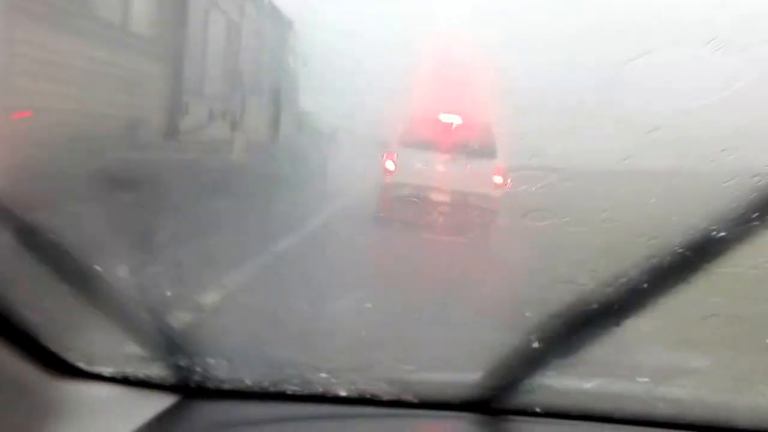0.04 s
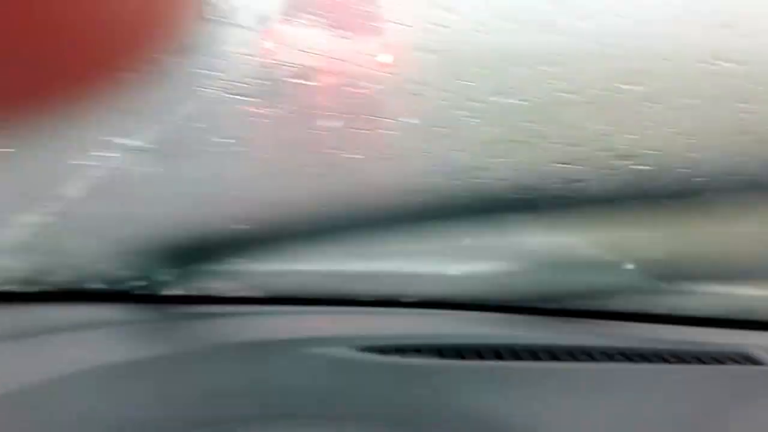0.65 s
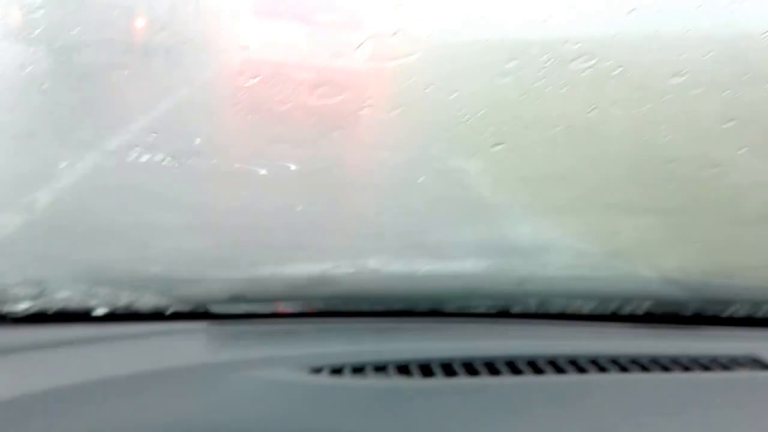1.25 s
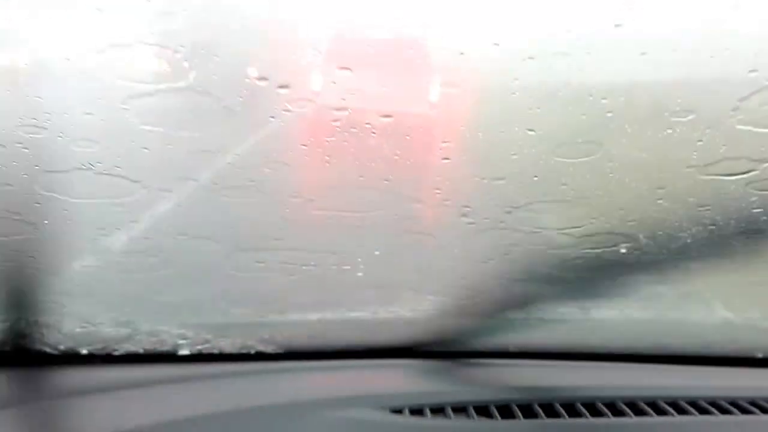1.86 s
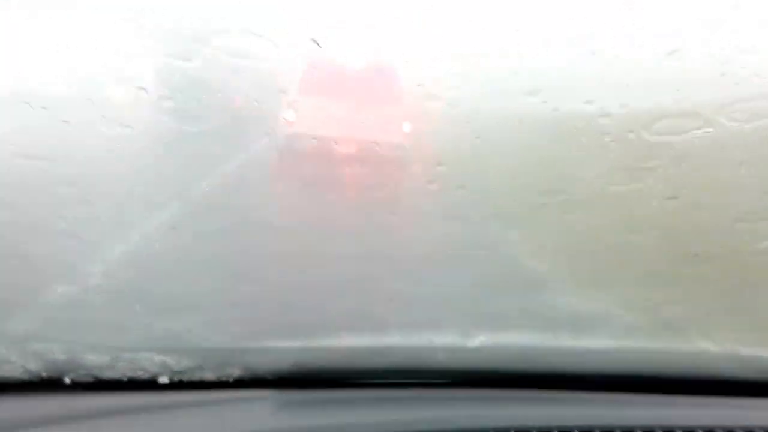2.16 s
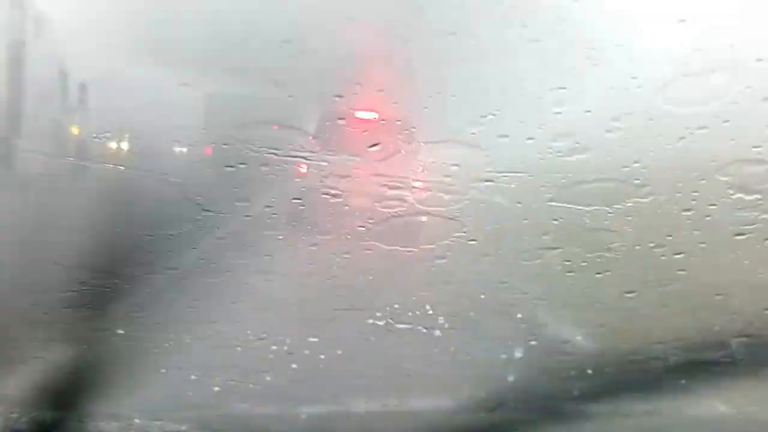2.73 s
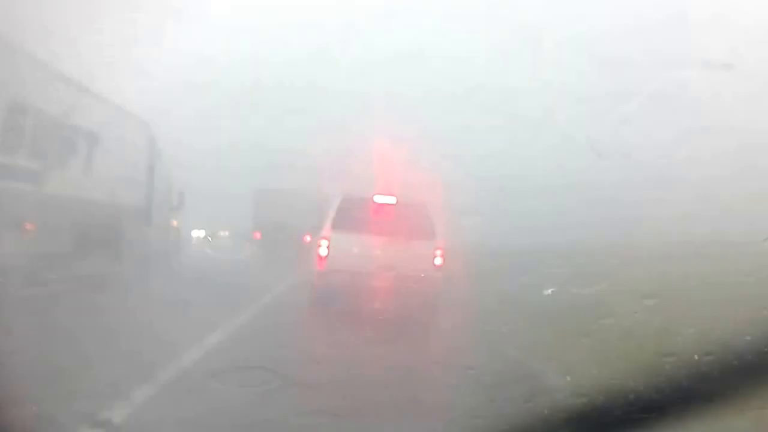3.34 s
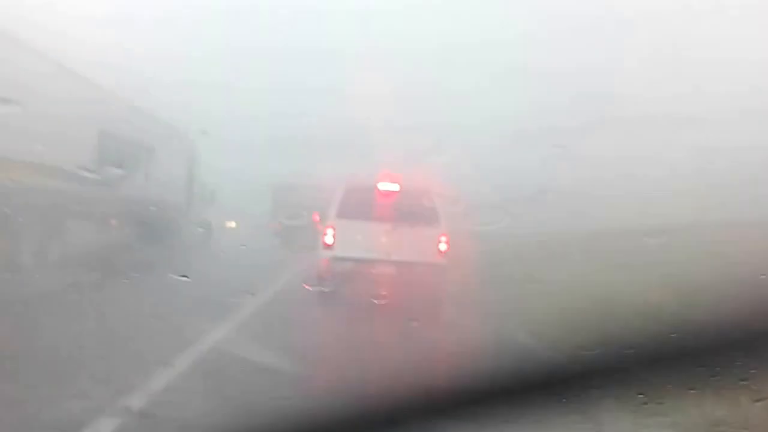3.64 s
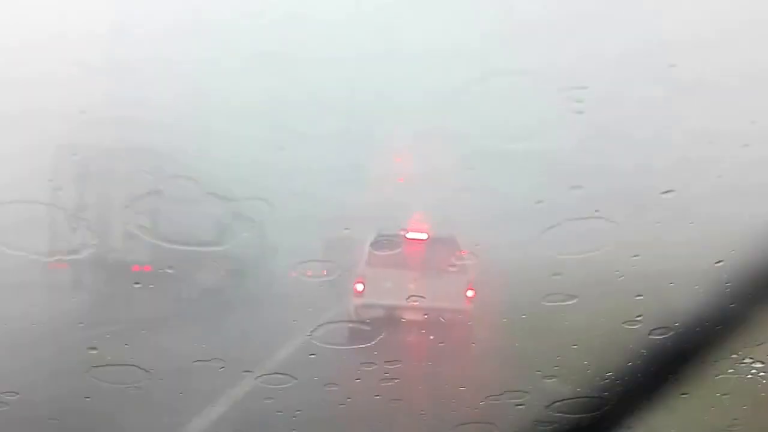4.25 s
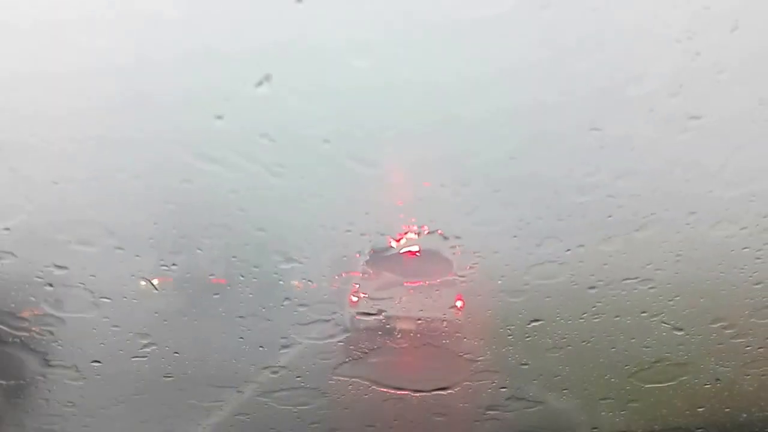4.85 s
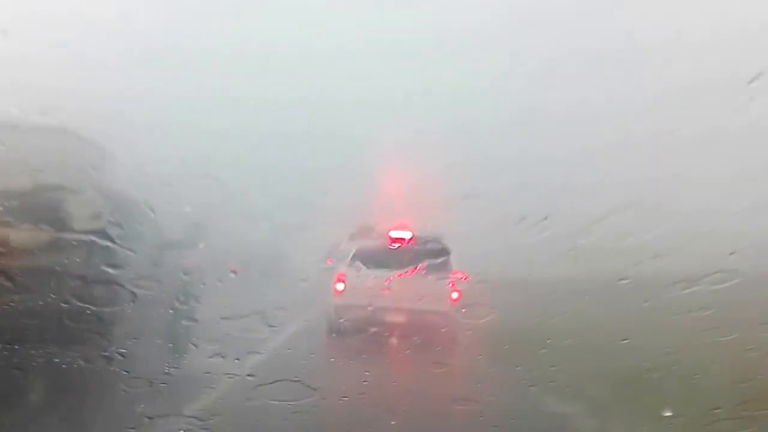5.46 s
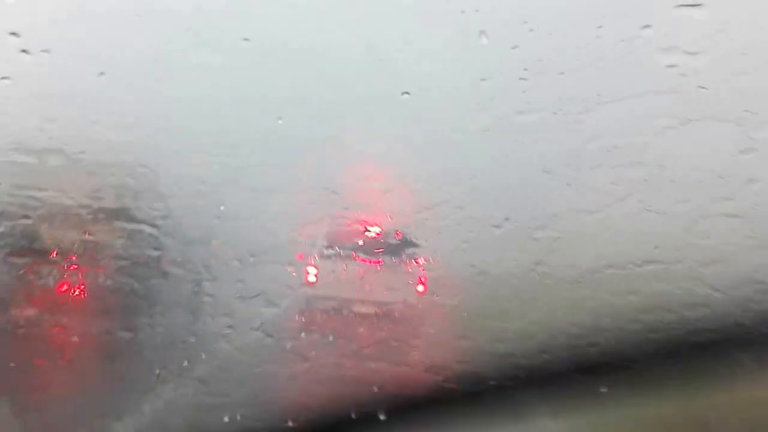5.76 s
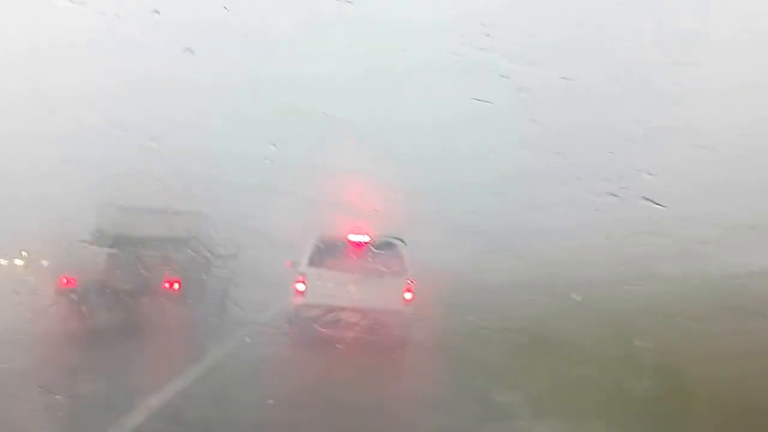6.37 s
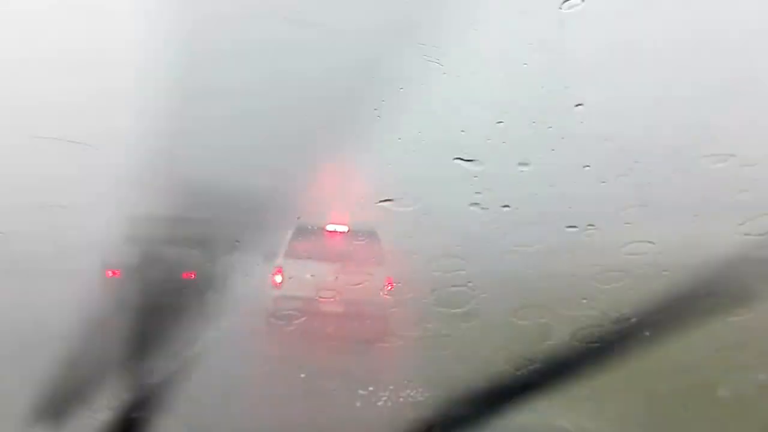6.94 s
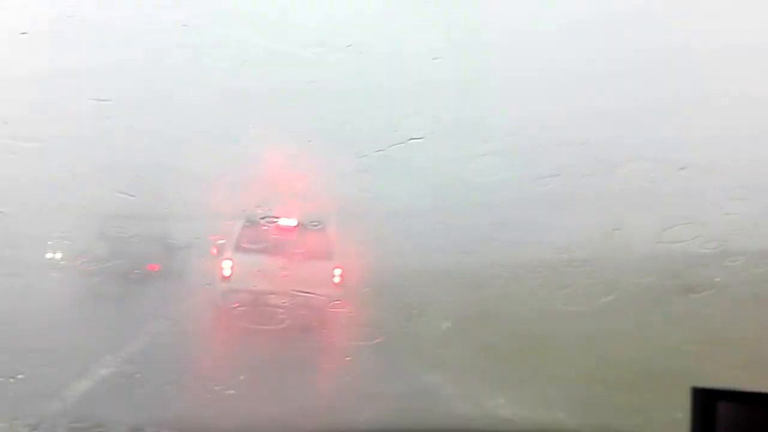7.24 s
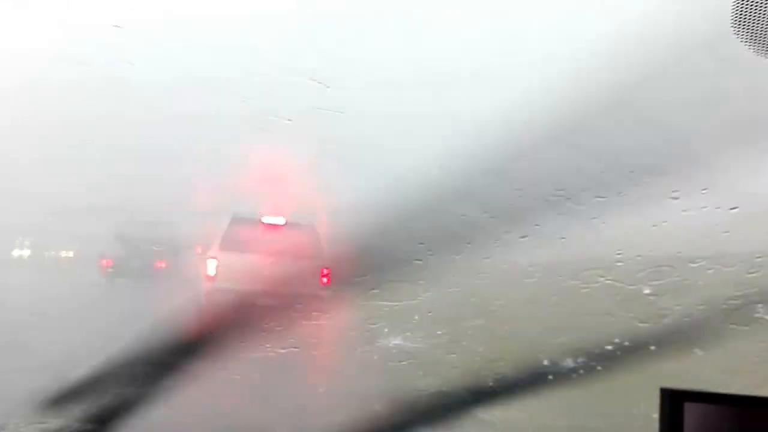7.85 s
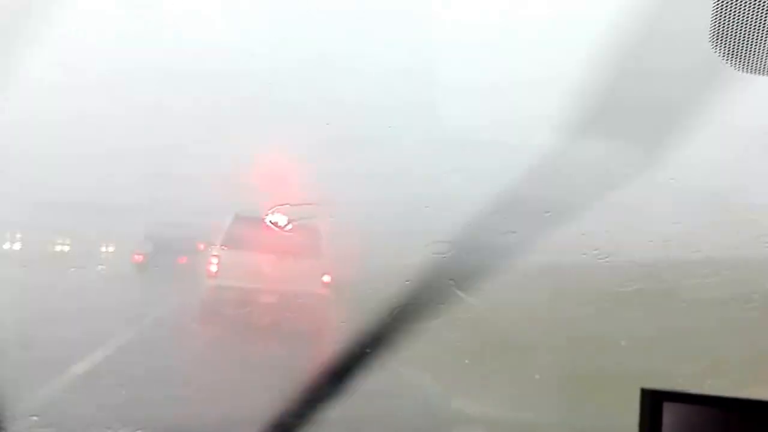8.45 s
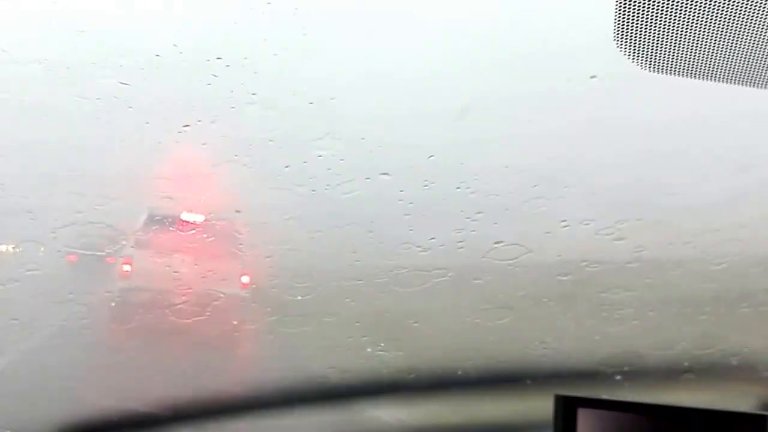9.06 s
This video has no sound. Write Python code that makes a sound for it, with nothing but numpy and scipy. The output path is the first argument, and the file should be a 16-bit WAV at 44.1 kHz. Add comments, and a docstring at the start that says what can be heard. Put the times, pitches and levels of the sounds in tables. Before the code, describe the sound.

Dense hail and rain patter on a car's windshield and roof, with big stones cracking over low tyre drone and engine hum.

```python
"""Inside a car driving slowly through a hailstorm, heard from just behind the windshield.
From the start, tyres drone and the engine hums under a dense patter of small ice and rain. At once big
stones crack on the glass or knock on the roof, ringing the cabin briefly, and bumps and wipers thud
through the body. The hardest hits land around 1 s and 3 s. The engine swells near 4 s, then fades
away, while the hail carries on a little lighter to the end."""
import sys
import numpy as np
from scipy import signal
from scipy.fft import rfft, irfft
from scipy.io import wavfile
from scipy.ndimage import uniform_filter1d

SR = 44100
rng = np.random.default_rng(int(sys.argv[2]) if len(sys.argv) > 2 else 0)


def unload_wav(signal):
    """Save mono or channel-first audio to the path in sys.argv[1] as 16-bit WAV at rate SR, clipped to [-1, 1]."""
    wavfile.write(
        sys.argv[1],
        SR,
        np.round(np.clip(np.atleast_2d(signal).T, -1, 1) * 32767).astype(np.int16),
    )


N = 405719
RING = 4096  # samples for one stone to ring out


def undb(db):
    """Decibels to gain."""
    return 10 ** (np.asarray(db) / 20)


def unit(x):
    """Scale to an rms of 1."""
    return x / np.sqrt(np.mean(x ** 2))


def curves(table):
    """Automation lanes: each column of a table joined by straight lines in time."""
    times, *columns = np.transpose(table)
    return [np.interp(np.arange(N) / SR, times, column) for column in columns]


def swell(start_s, length_s, rise_s, fall_s):
    """Attack, hold and release, from 0 to 1 and back."""
    end_s = start_s + length_s
    return np.interp(np.arange(N) / SR, [start_s - rise_s, start_s, end_s, end_s + fall_s], [0, 1, 1, 0])


def colour(points, hz):
    """Gain of an EQ curve of (frequency [Hz], level [dB]) points at the given frequencies."""
    point_hz, db = np.transpose(points)
    return undb(np.interp(np.log(hz + 1), np.log(point_hz), db))


def noise(points):
    """Noise through an EQ curve, rolling off above its last point."""
    hz = np.fft.rfftfreq(N, 1 / SR)
    gain = colour(points, hz) / np.maximum(1, hz / points[-1][0]) ** 2
    return unit(irfft(rfft(rng.standard_normal(N)) * gain, N))


# fader ride of the tyre drone: (time [s], relative level [dB])
TYRE_LEVELS = [(0, -32), (2.8, -36.5), (3.7, -36.5), (8, -37.5), (9.2, -35.5)]
# cabin response to the tyres: (frequency [Hz], level [dB])
DRONE_EQ = [(30, -18), (95, -7), (128, 3), (185, 0.5), (290, -10.5), (390, -10.5), (520, -17),
            (1000, -22.5), (3000, -25)]
# low boom of the body on its springs: (frequency [Hz], level [dB])
BOOM_EQ = [(15, -24), (34, -2), (43, -3), (51, 7), (66, -6.5), (110, -51)]
# bumps in the road: (start [s], length [s], relative boom level [dB])
BUMPS = [(0.173, 0.046, -28), (0.287, 0.066, -33), (0.584, 0.11, -36), (1.024, 0.168, -31),
         (1.867, 0.074, -31), (2.294, 0.077, -38), (2.705, 0.04, -30), (2.785, 0.03, -30),
         (4.413, 0.056, -37), (5.28, 0.03, -38), (6.089, 0.098, -39), (6.939, 0.034, -35),
         (7.795, 0.061, -35), (8.64, 0.082, -32)]
def road(drone_gain_db=1.5, bump_gain_db=-3, smooth_road_db=-41.5, shake=0.11):
    """Tyres drone through the cabin; each bump booms the body and swells the drone."""
    drone_db, = curves(TYRE_LEVELS)
    jolts = sum(undb(db + bump_gain_db) * swell(start_s, length_s, rise_s=0.026, fall_s=0.079) ** 2
                for start_s, length_s, db in BUMPS)
    boom_gain = undb(smooth_road_db) + jolts
    drone = noise(DRONE_EQ) * undb(drone_db + drone_gain_db) * (boom_gain / boom_gain.mean()) ** shake
    return drone + noise(BOOM_EQ) * boom_gain


# pitch and fader ride of the engine: (time [s], firing rate [Hz], level [dB])
ENGINE_HUM = [(0, 73.9, -46), (2.4, 79.2, -47), (4.1, 81.3, -38), (5.5, 80.6, -51), (9.2, 73.7, -67)]
def engine():
    """A low, pure hum at the firing rate."""
    firing_hz, level_db = curves(ENGINE_HUM)
    phase = 2 * np.pi * np.cumsum(firing_hz) / SR
    return unit(np.sin(phase)) * undb(level_db)


def causal(gain):
    """The minimum-phase response with this gain: it rings only after the blow."""
    cepstrum = irfft(np.log(gain + 1e-6))
    cepstrum[1:RING // 2] *= 2
    cepstrum[RING // 2 + 1:] = 0
    return np.exp(rfft(cepstrum))


# tone of a stone heard through glass and roof: (frequency [Hz], level [dB])
PANEL_EQ = [(120, -8), (330, 1), (600, -5.5), (1000, -0.5), (1600, 1.5), (2500, -6), (3550, -2.5),
            (5200, -8), (6500, -16.5), (8200, -25.5), (10000, -26), (14000, -33.5)]
# bands of body knock, glass ring and ice splinters: (low edge [Hz], high edge [Hz])
IMPACT_BANDS = [(500, 1800), (1800, 6500), (6500, 14000)]
# stereo width of the cabin's reflections: (frequency [Hz], side gain [dB])
CABIN_WIDTH = [(2800, -98), (4300, -37), (6500, -4), (9000, -1)]
def impact(band_db, direct, ring_hz, snap, touch_s, ring_db,
           ring_width=0.14, glass_s=0.0034, build_s=0.0036, cabin_s=0.012, uneven_db=2.0):
    """One stone, as mid and side: ice snaps, bending waves bounce across the pane, the cabin answers."""
    t, hz = np.arange(RING) / SR, np.fft.rfftfreq(RING, 1 / SR)
    pane, echoes, *cabin = rng.standard_normal((4, RING))
    # reflections arrive in uneven packets about a millisecond long
    packets = undb(uneven_db * unit(uniform_filter1d(echoes, size=60)))
    pane = pane * packets * (1 - np.exp(-t / touch_s)) * np.exp(-t / glass_s)
    cabin = np.array(cabin) * np.sqrt(packets) * (1 - np.exp(-t / build_s)) * np.exp(-t / cabin_s)
    # the snap of contact is a single click on the front of the pane's ring
    click = snap * np.sqrt(RING) * colour([(4500, -5.5), (8500, -6.0)], hz)
    attack = (rfft(unit(pane)) + click) / np.sqrt(1 + click ** 2 / RING)
    # the long waves of the body build up slowly, so the attack is mostly treble
    treble = colour([(700, -12), (2400, 8)], hz).clip(0, 1)
    attack_share = np.clip(1.043 * direct, .03, .94) * treble
    blow = np.sqrt(1 - attack_share) * rfft(unit(cabin))
    blow[0] += np.sqrt(attack_share) * attack  # straight ahead, so mid only
    # each spot on a panel favours its own resonance
    resonance = np.exp(-(np.log((hz + 1) / ring_hz) / ring_width) ** 2)
    tone = colour(PANEL_EQ, hz) * undb(ring_db * resonance)
    # trim each band towards its level in band_db, with the energy spread over 10 ms
    power = np.abs(blow[0] * tone) ** 2 * 2 / RING / (SR / 100)
    band_power = [power[(hz > low) & (hz < high)].sum() for low, high in IMPACT_BANDS]
    body_db, glass_db, splinter_db = band_db - 10 * np.log10(band_power)
    tone *= colour([(1450, body_db), (2700, glass_db), (5500, glass_db), (7500, splinter_db)], hz)
    width = np.array([np.ones(len(hz)), colour(CABIN_WIDTH, hz)])
    return irfft(blow * causal(tone) * width)


def shower(per_second, scatter_db, band_db, direct, snap, ring_hz=3700, count=32):
    """Many small stones of mixed size, falling at random on spots from dull to brittle."""
    spots = [impact(np.add(band_db, [0, 0, 6 * hardness]), direct, ring_hz * np.exp(0.64 * hardness),
                    snap, touch_s=0.00077, ring_db=6.5)
             for hardness in np.linspace(-1, 1, count)]
    out = np.zeros((2, N + RING))
    for when, size, where in rng.random((int(per_second * N / SR), 3)):
        start = int(when * N)
        out[:, start:start + RING] += undb(scatter_db * size ** 2) * spots[int(where * count)]
    return out[:, :N] / np.std(out[0])


# fader ride of the small ice and rain: (time [s], glass level [dB], relative roof level [dB])
SHOWER_LEVELS = [(0.0, -29, -28), (0.18, -26.5, -33.5), (1.61, -32, -39.5), (1.74, -30.5, -36.5),
                 (3.07, -28.5, -35.5), (3.89, -36, -37.5), (4.3, -33.5, -39), (4.77, -36.5, -40),
                 (5.84, -30.5, -36), (6.53, -30.5, -33.5), (6.82, -31, -36.5), (7.64, -34, -35.5),
                 (7.89, -38, -40.5), (8.35, -33.5, -37.5), (8.99, -33.5, -33.5), (9.2, -37, -36)]
# flurries (+) and lulls (-): (start [s], length [s], glass change [dB], roof change [dB])
FLURRIES = [(0.244, .12, 1.5, 6), (1.147, 0.11, -9, 0.5), (1.37, 0.053, -17, -2), (1.595, 0.088, 0, 4),
            (1.766, 0.1, -3.5, -0.5), (1.906, 0.087, -1, 8.5), (2.96, .07, 1.5, 4.5), (3.4, 0.048, 5, 3.5),
            (4.874, 0.046, -10, -7.5), (5.078, 0.21, -4, 0), (5.402, .08, 1.5, -1), (6.68, 0.16, -4, -0.5),
            (6.97, 0.046, 1.5, 5.5), (7.07, .05, -4, -5), (7.27, 0.025, -6.5, -3), (7.453, 0.049, 3.5, 3),
            (7.87, 0.063, -7, -0.5), (8.87, 0.12, 3.5, -1.5)]
def patter(roof_gain_db=1.18, ice_gain_db=-13):
    """Ticking on the windshield, denser, duller drumming on the roof, and grains of ice shattering."""
    levels_db = np.array(curves(SHOWER_LEVELS))
    for start_s, length_s, *change_db in FLURRIES:
        levels_db += np.outer(change_db, swell(start_s, length_s, rise_s=0.018, fall_s=0.024))
    glass_db, roof_db = levels_db
    glass = shower(per_second=200, scatter_db=13.5, band_db=[-12, 0, -17], direct=0.76, snap=0)
    roof = shower(per_second=380, scatter_db=17.5, band_db=[0, -5, -25], direct=0.39, snap=0)
    ice = shower(per_second=45, scatter_db=16, band_db=[-12, 0, -3], direct=0.55, snap=2.3)
    return (glass + ice * undb(ice_gain_db)) * undb(glass_db) + roof * undb(roof_db + roof_gain_db)


# cue list of the big stones: (time [s], ring level over 10 ms [dB],
# directness [0 far roof to 1 windshield], splinters against the ring [dB], ring pitch [Hz])
BIG_STONES = [(0.031, -18.5, 0.5, -11, 2000), (0.152, -25, 0.38, -15, 5000),
              (0.1897, -22.5, 0.39, -12, 3900), (0.3652, -18.5, 0.61, -14, 2000),
              (0.456, -23, 0.75, -17, 3400), (0.4699, -23, 1.0, -13, 5300),
              (0.4983, -19.5, 0.82, -13, 3500), (0.6417, -23.5, 0.92, -13, 4100),
              (0.6645, -22, 0.4, -9, 2800), (0.701, -19.5, 0.48, -12.5, 4800),
              (0.7497, -23.5, 1, -16, 4000), (0.8212, -20.5, 1, -12, 2800), (0.86, -21.5, 1.0, -13, 4000),
              (0.894, -11.5, 1.0, -17, 4340), (0.9348, -18, 0.5, -18, 3230), (1.001, -19, 0.51, -17, 2100),
              (1.069, -18.5, 0.51, -21, 3020), (1.0967, -24, 0.14, -6.5, 2200),
              (1.179, -18.5, 0.7, -11, 4230), (1.22, -8, 0.97, -16, 4000), (1.2327, -17.5, 1.0, -12, 2000),
              (1.303, -19.5, 0.7, -16, 4240), (1.338, -20.0, 0.16, -14, 4900),
              (1.401, -22, 0.43, -16, 4600), (1.4242, -23.5, 0.54, -10.5, 3570),
              (1.4764, -23.5, 1.0, -6, 3860), (1.5315, -20.5, 0.55, -14, 4300),
              (1.5651, -21.5, 0.14, -17, 2010), (1.7134, -23, 0.61, -3.5, 6450),
              (1.739, -24.5, 0.55, -15, 4600), (2.1577, -18.5, 0.89, -12, 3800),
              (2.191, -23.5, 0.34, -28, 3200), (2.252, -23.5, 1.0, -12, 4300),
              (2.3252, -22, 0.86, -9.5, 2600), (2.4338, -19, 0.85, -15, 3680),
              (2.4868, -16, 0.58, -20, 2000), (2.524, -15.5, 0.93, -11.5, 3120),
              (2.584, -21, 0.86, -7, 5760), (2.66, -21, 0.84, -28, 3770), (2.7272, -21.0, 0.79, -12, 3500),
              (2.7887, -14.5, 0.51, -13, 4400), (2.8651, -25, 1.0, -10, 3100),
              (2.888, -16.5, 1.0, -14.5, 2170), (2.927, -17, 1.0, -16.5, 3680),
              (3.0173, -20, 0.5, -11, 3300), (3.068, -11, 0.96, -12.5, 3320), (3.1664, -21, 1.0, -20, 2000),
              (3.2052, -21.5, 0.86, -14, 3700), (3.2165, -19.5, 1.0, -17, 3100),
              (3.346, -22.5, 1.0, -17, 4470), (3.5657, -23, 0.79, -10, 5800),
              (3.6016, -23.5, 0.52, -24, 3900), (3.7038, -13.5, 0.67, -17.5, 4270),
              (3.785, -26.0, 1, -8, 2000), (3.8715, -22, 1, -8, 5050), (3.934, -22, 0.62, -15, 4600),
              (3.9963, -22.5, 0.94, -17, 3300), (4.087, -24.5, 0.14, -17, 2610),
              (4.163, -27, 1.0, -5.5, 3700), (4.1698, -19, 0.78, -31, 2400), (4.2264, -27, 0.17, -11, 2500),
              (4.3457, -29.5, 1.0, -7, 2300), (4.379, -22, 0.54, -13, 3700), (4.507, -17.5, 1, -12, 4200),
              (4.572, -22, 0.75, -11.5, 4100), (4.7626, -17.5, 0.84, -19, 3430),
              (4.837, -23, 0.44, -36, 3450), (4.9277, -23, 0, -12.5, 6100),
              (4.9549, -22.5, 0.79, -20, 3320), (5.0206, -30, 0.65, -13, 3500),
              (5.034, -21.5, 0.91, -17, 3560), (5.1312, -22.5, 0.21, -16, 2010),
              (5.22, -22.5, 0.39, -20, 2380), (5.4886, -21, 0.76, -13, 2770),
              (5.7484, -19, 0.91, -10, 3440), (5.8594, -26.5, 1, -6.5, 2920),
              (5.9314, -17.5, 0.41, -13.5, 5060), (6.1377, -22, 0.97, -22, 2700),
              (6.294, -24.5, 0.18, -13, 4700), (6.3782, -20, 0.44, -12, 4200),
              (6.6459, -19.5, 0.57, -14, 4270), (7.0846, -24.5, 1, -12, 3380),
              (7.129, -20, 0.86, -17, 2520), (7.1684, -24.5, 1, -7.5, 5240),
              (7.2294, -24, 0.38, -12.5, 2900), (7.3784, -20.5, 0.11, -9.5, 3460),
              (7.4094, -22, 1.0, -11, 6100), (7.5062, -27, 0.84, -6, 6500), (7.6671, -27, 0.04, -14, 2700),
              (7.7139, -21.5, 0.67, -13.5, 5030), (7.8086, -24.5, 0.5, -10.5, 3240),
              (7.8492, -26.0, 0.18, -16, 2140), (8.012, -24, 1.0, -12, 3700),
              (8.0447, -25, 0.68, -16, 3620), (8.099, -29, 0.84, -5, 5300), (8.213, -22, 0.82, -29, 3520),
              (8.2825, -28, 1.0, -11, 3900), (8.324, -30, 0, -15, 4800), (8.3375, -25.5, 0.87, -14, 4200),
              (8.4343, -19, 0.96, -10, 3960), (8.4686, -28, 1.0, -2, 5500),
              (8.5211, -24.5, 0.55, -16, 2600), (8.697, -24.5, 1, -19, 2800),
              (8.7638, -23, 0.12, -13, 1990), (8.823, -17.5, 1.0, -15, 2140), (9.033, -24, 0.36, -13, 5000),
              (9.0775, -19.5, 0.62, -10, 4900), (9.1521, -21, 0.22, -14, 5960)]
def hailstones(roof_knock_db=-1.5, glass_knock_db=-13, knock_db_per_octave=-3.5, middle_ring_hz=3630):
    """Big stones in the foreground: roof hits knock, direct hits on the windshield snap."""
    out = np.zeros((2, N + RING))
    for time_s, db, direct, splinter_db, ring_hz in BIG_STONES:
        # the sheet metal knocks most on the roof, less on the glass and at spots that ring high
        knock_db = glass_knock_db + (roof_knock_db - glass_knock_db) * (1 - direct) ** 2
        knock_db += knock_db_per_octave * np.log2(ring_hz / middle_ring_hz)
        band_db = db + np.array([knock_db, 0, splinter_db])
        snap = 1.3 * direct ** 2 * undb(0.3 * (splinter_db + 12))  # ice that splinters clicks harder
        start = int(time_s * SR)
        out[:, start:start + RING] += impact(band_db, direct, ring_hz, snap, touch_s=0.00033, ring_db=4.5)
    return out[:, :N]


# cue list of wiper-arm and bump thuds: (time [s], relative level [dB], pitch [Hz])
THUD_CUES = [(0.31, -20.5, 164), (0.599, -27, 80.7), (1.068, -31, 141), (1.421, -28, 105),
             (1.909, -19, 177), (2.288, -27, 80.7), (2.706, -26, 159), (3.264, -24, 156), (3.988, -26, 125),
             (5.138, -22.5, 195), (5.669, -24.5, 100), (8.763, -23.5, 127)]
def thuds(gain_db=-8.5, rise_s=0.019, spread=0.31):
    """Soft blows of wipers and bumps swell and die in the low resonances of the body."""
    t, hz = np.arange(SR) / SR, np.fft.rfftfreq(SR, 1 / SR)
    out = np.zeros(N + SR)
    for time_s, db, pitch_hz in THUD_CUES:
        resonance = np.exp(-(np.log((hz + 1) / pitch_hz) / spread) ** 2)
        body = irfft(rfft(rng.standard_normal(SR)) * resonance, SR)
        thud = body * t * np.exp(-t / rise_s)
        start = int(time_s * SR)
        out[start:start + SR] += undb(db + gain_db) * thud / np.std(thud[:SR // 10])
    return out[:N]


def scene():
    """The mix: only the treble of the hail spreads left and right; the rest sits in the centre."""
    mid, side = hailstones() + patter()
    mid = mid + thuds() + road() + engine()
    return np.array([mid + side, mid - side])


def record(dry, clip_level=0.9, top_hz=14350):
    """The hardest cracks overload and clip; a steep low-pass takes off the top."""
    low_pass = signal.ellip(10, .1, 80, top_hz, fs=SR, output="sos")
    return signal.sosfilt(low_pass, np.clip(dry, -clip_level, clip_level))


dry = scene()
out = record(dry)
unload_wav(out)
```